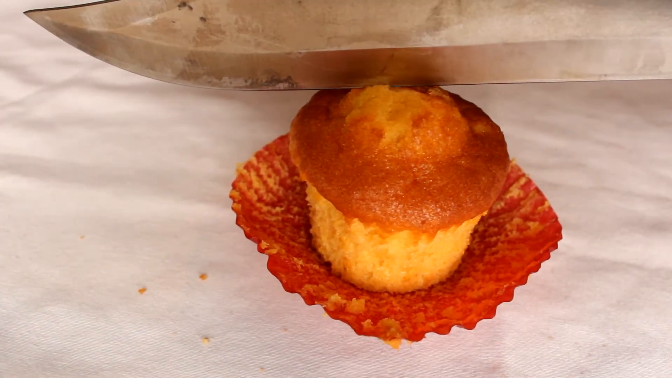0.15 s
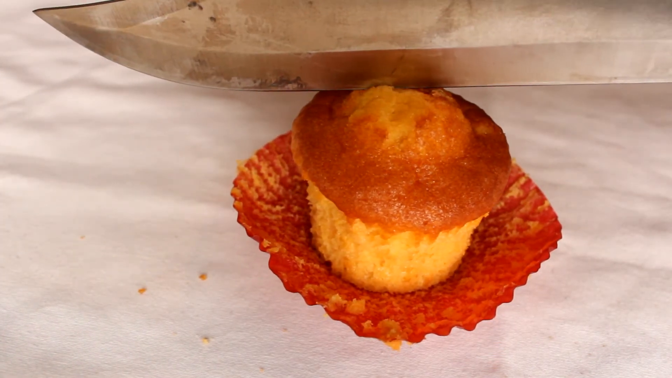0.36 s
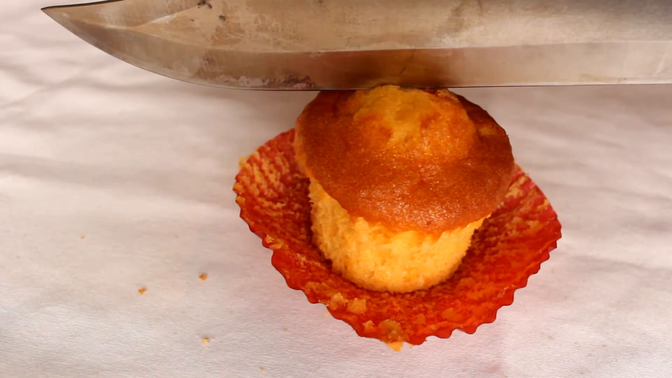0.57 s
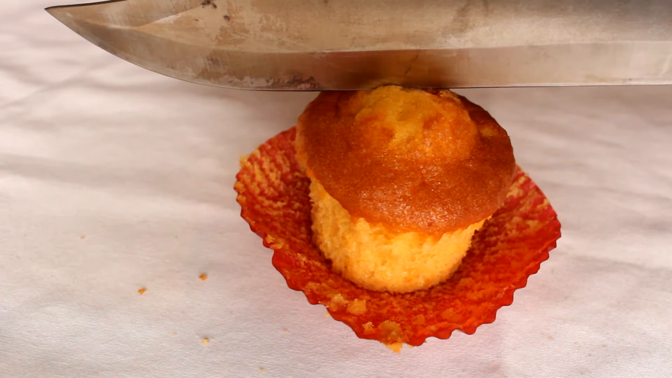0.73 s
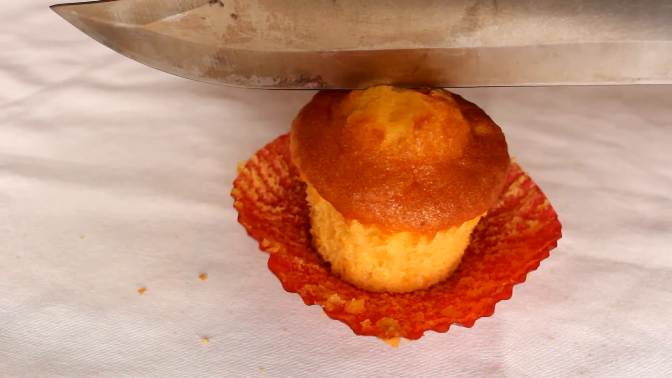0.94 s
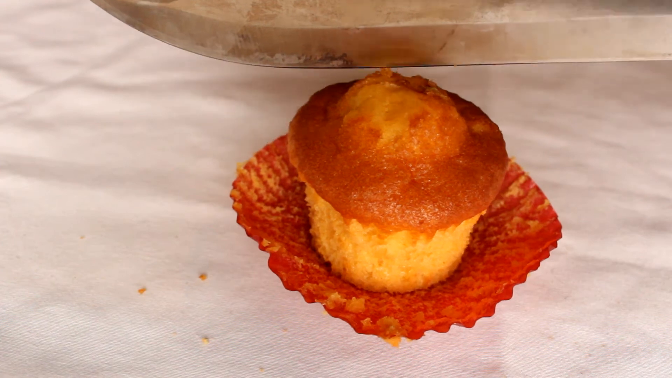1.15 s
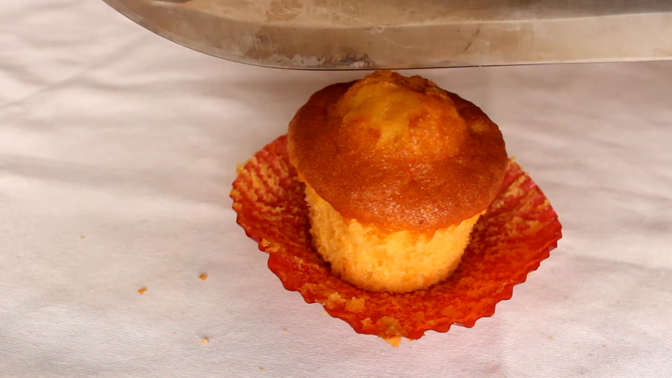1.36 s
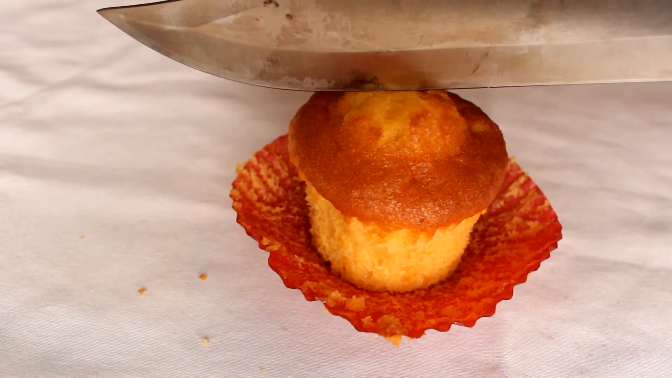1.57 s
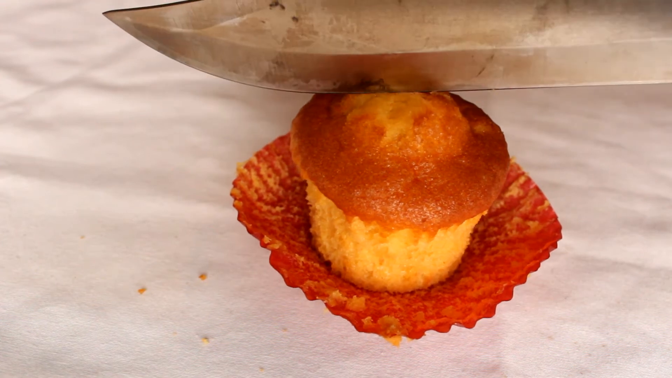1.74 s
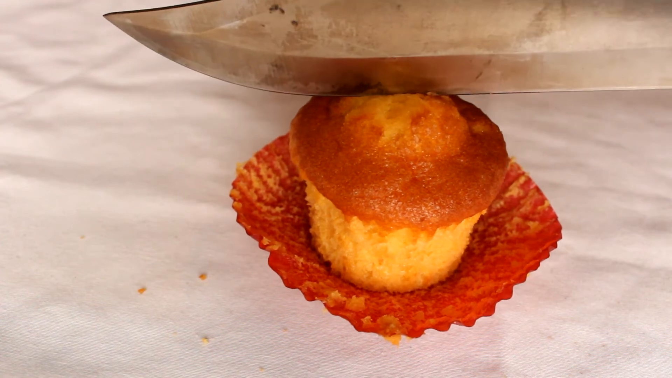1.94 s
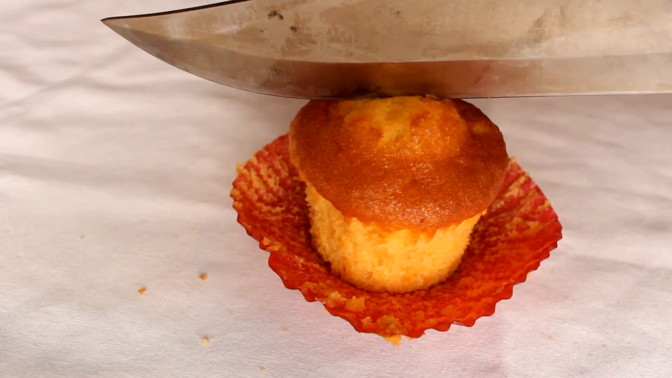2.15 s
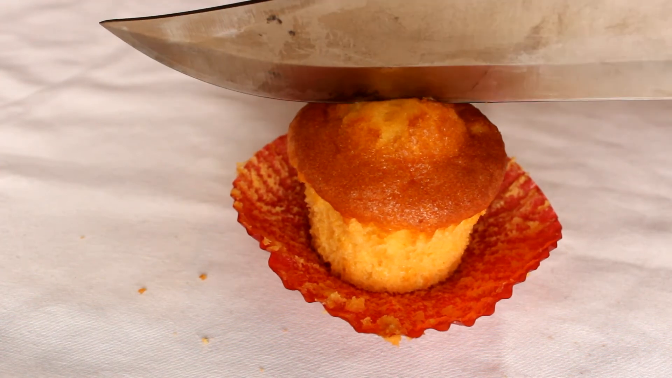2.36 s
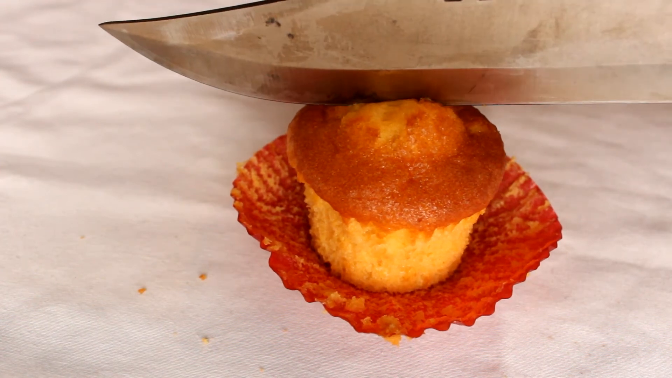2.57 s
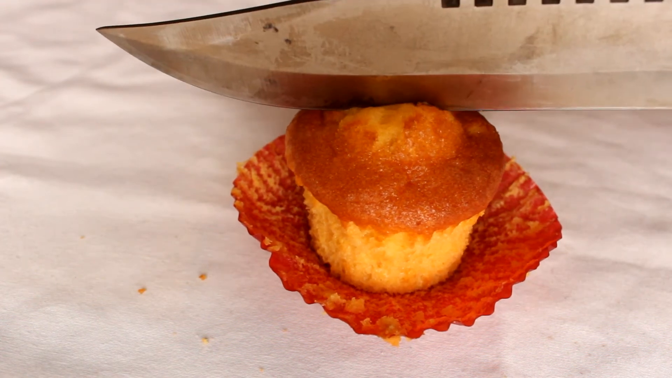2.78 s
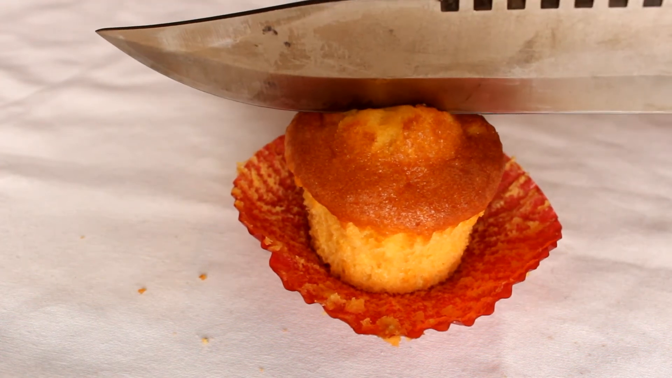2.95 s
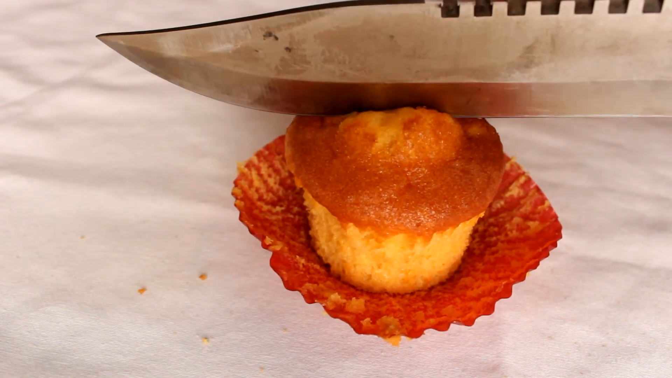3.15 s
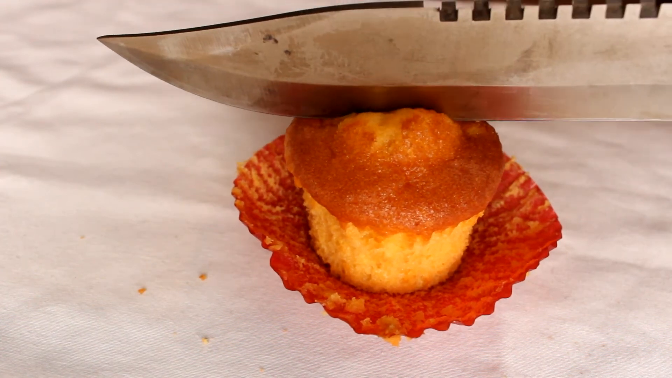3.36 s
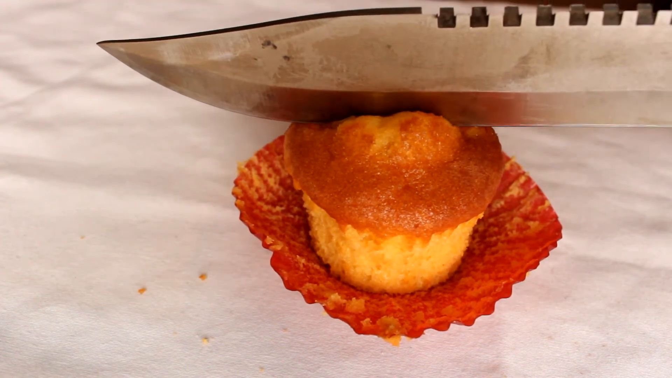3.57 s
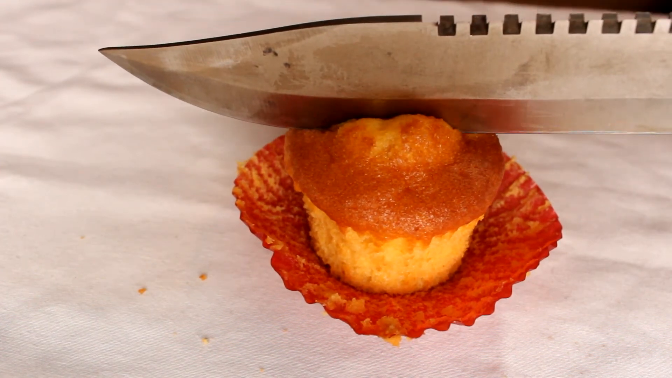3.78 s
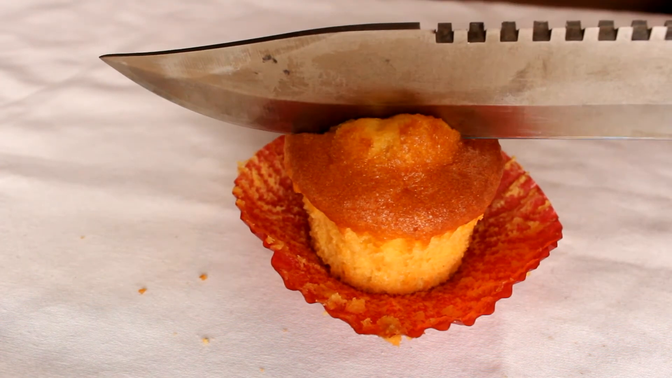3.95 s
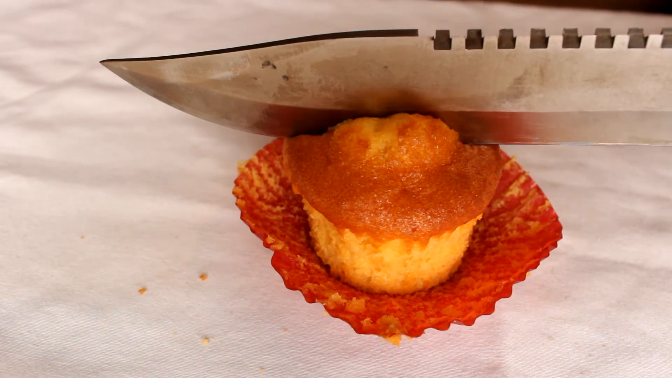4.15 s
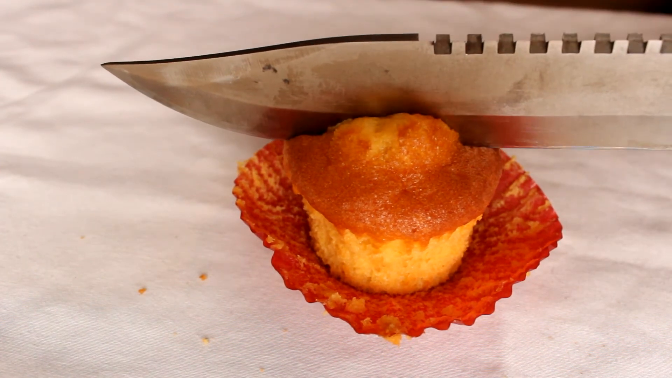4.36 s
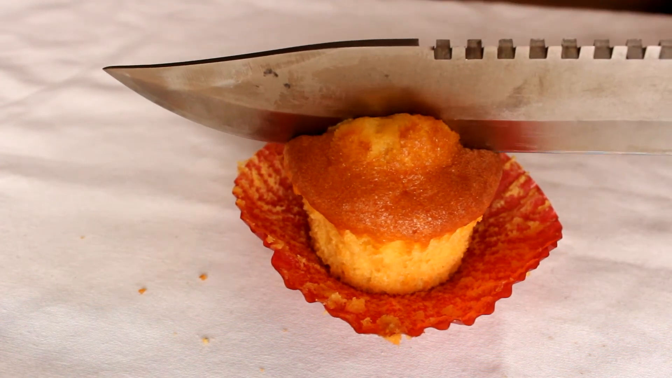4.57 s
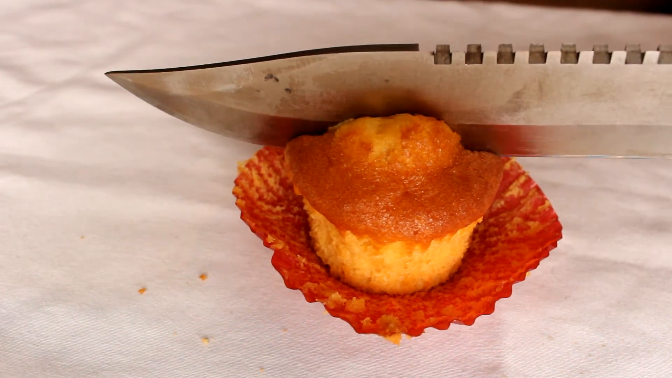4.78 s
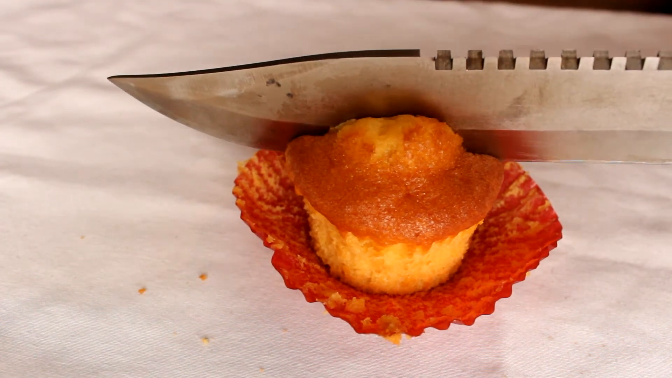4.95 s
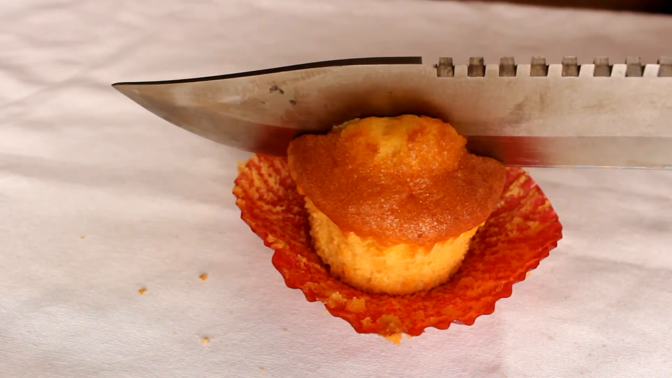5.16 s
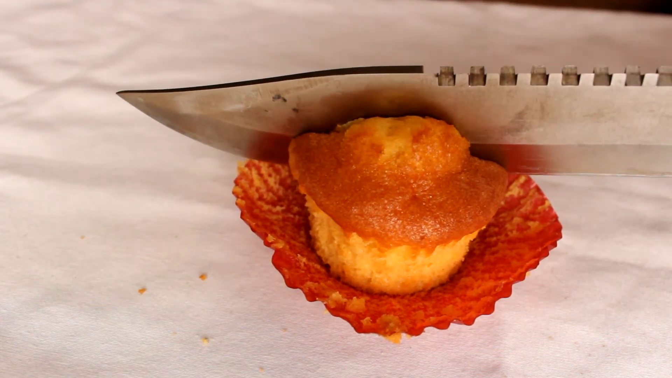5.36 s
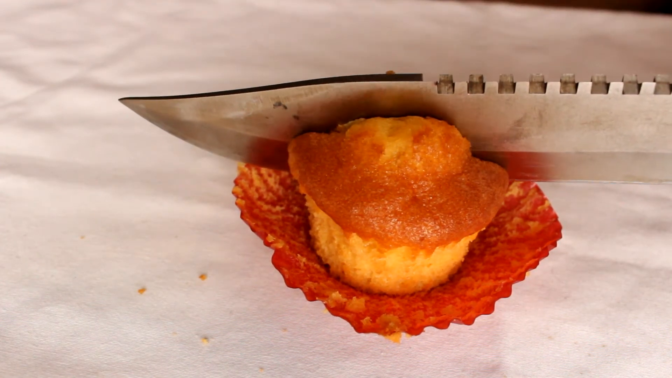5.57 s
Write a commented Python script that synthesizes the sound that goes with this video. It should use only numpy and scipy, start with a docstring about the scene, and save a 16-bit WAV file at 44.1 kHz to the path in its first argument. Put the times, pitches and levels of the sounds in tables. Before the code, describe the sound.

Close microphone, small quiet room, barely any echo. Steel edge brushes crust faintly for a second, with sparse specks of crackle and a soft thud. Then moisture boils on the blade: hissy, high, irregular snaps build quickly, peak bright, then mix with rounder, lower pops from inside the cake. Low rumble stays very faint. The crackle is strongest in the last half second and stops still sizzling.

```python
"""A quiet room with hum, and in it a cloth-covered table: a hot blade sinks slowly into a muffin, close by.
Moisture boils on the steel: a bright fizz of tiny bursts at the crust, then duller pops from deep steam pockets.
Bursts are spikes amid sputter, filtered into four colours for deep, crumb, crust and spray, over steam noise.
Brushing strokes, low rumble and one soft knock are shaped noise and a decaying sine; the table filters the sizzle."""
import sys
import numpy as np
from scipy import signal
from scipy.fft import rfft, irfft, next_fast_len
from scipy.io import wavfile
from scipy.ndimage import map_coordinates

SR = 44100
rng = np.random.default_rng(int(sys.argv[2]) if len(sys.argv) > 2 else 0)


def bounce(signal):
    """Save signal as a 16-bit WAV file at the path given by the first command-line argument."""
    frames = np.transpose(np.atleast_2d(signal))
    limited = np.clip(frames, -1, 1)
    pcm = np.round(limited * 32767).astype(np.int16)
    wavfile.write(sys.argv[1], SR, pcm)


N = 247842

# Boiling along the blade. Each row: time in seconds, deep pockets in dB, surface in dB.
BOIL_LEVELS = [(0.0,-76,-67), (0.33,-72.5,-61.5), (0.5,-73.5,-64.5), (0.92,-71.5,-72), (1.21,-78,-74.5),
               (1.32,-73,-69.5), (1.45,-76,-73), (1.5,-72,-61), (1.55,-74,-63), (1.61,-69.5,-55.5),
               (1.7,-68.5,-50.5), (1.87,-68.5,-52.5), (2.14,-60,-49), (2.5,-64,-48.5), (2.71,-59.5,-44.5),
               (2.96,-61,-44), (3.49,-56,-39.5), (3.66,-56.5,-41), (3.87,-53.5,-46.5), (4.02,-51.5,-47),
               (4.4,-51,-50), (4.66,-49,-49.5), (4.71,-46,-49), (4.86,-46.5,-51.5), (4.98,-45,-49.5),
               (5.12,-43,-52), (5.25,-41.5,-49), (5.28,-39,-48), (5.37,-40.5,-60), (5.435,-43,-48),
               (5.48,-42.5,-50), (5.52,-42.5,-46.5), (5.56,-38.5,-49), (5.62,-41,-47)]
# Crumb and crust are fed by both ends over a faint simmer: gain from deep dB, from surface dB, simmer level dB.
CRUMB_FEED_DB = (0, -8.5, -70)
CRUST_FEED_DB = (-7.5, -1.8, -97)


def depths():
    """Boiling level in dB at four depths (deep, crumb, crust, spray); the middle two add power from both ends."""
    deep_db, spray_db = curves(BOIL_LEVELS)

    def fed(from_deep_db, from_surface_db, simmer_db):
        power = amp(deep_db + from_deep_db) ** 2 + amp(spray_db + from_surface_db) ** 2 + amp(simmer_db) ** 2
        return 20 * np.log10(np.sqrt(power))

    return np.array([deep_db, fed(*CRUMB_FEED_DB), fed(*CRUST_FEED_DB), spray_db])


# Colour of each depth. Each row: frequency in Hz, relative level in dB.
DEEP_COLOUR = [(100, -71), (300, -19.5), (450, -11.5), (560, -5.5), (800, -0.5), (1250, 0.5), (1900, -3),
               (2600, -13), (6000, -56)]
CRUMB_COLOUR = [(300, -89), (1400, -8), (2000, -3.5), (2900, 1.5), (3600, 1.5), (4300, -2), (5500, -12),
                (9000, -43)]
CRUST_COLOUR = [(1000, -91), (3500, -29), (4200, -3.5), (4700, -2), (5300, -7), (6400, -2), (8500, -7.5),
                (10500, -9), (16000, -43)]
SPRAY_COLOUR = [(3000, -77), (7500, -8), (9300, -8), (10500, -3.5), (14500, -5), (15200, -11.5),
                (15900, -13.5)]
SMEAR = 0.31  # 0: depths arrive together as one sharp spike, 1: each rings after the blow
LEAN_RAD = -1.1  # phase turn: a short push leads the dip
SMALL_BURSTS_PER_S = 800


def boiling():
    """Thousands of small bursts of very unequal size, in clumps, over escaping steam; each heard at every depth."""
    count = round(SMALL_BURSTS_PER_S * N / SR)
    times = rng.random(count) * (N - 1) / SR
    rarity = -np.log(np.clip(rng.random((5, count)), .05, 1))  # row 0 shared by the depths, then one row each
    clumps = wobble(40)
    # Each row: colour, own size spread in dB, steam in dB under the pops.
    layers = [(DEEP_COLOUR, 3.5, -8), (CRUMB_COLOUR, 3.5, -7), (CRUST_COLOUR, 3, -3), (SPRAY_COLOUR, 2.2, 0.3)]
    out = np.zeros(N)
    for (colour, own_db, steam_db), level_db, own_rarity in zip(layers, depths(), rarity[1:]):
        size = amp(2.17 * rarity[0] + own_db * own_rarity)
        shapes = sputter(count, spit_db=-21, t60=0.0073)[:, :SR // 300]
        pops = unit(place(times, size[:, None] * shapes))
        steam = amp(steam_db) * rng.standard_normal(N)
        flow = amp(1.25 * clumps + 0.65 * wobble(25)) * (pops + steam)
        out += amp(level_db - 0.88) * unit(coloured(flow, colour, SMEAR, LEAN_RAD))
    return out


# The loudest steam bursts, peak strengths before the trims below.
# Each row: time in seconds, deep in dB, crumb in dB, crust and spray in dB.
LOUD_BURSTS = [(0.1563, -63, -47, -33.5), (0.183, -61, -47, -32), (0.2989, -63.0, -56, -33),
               (0.302, -67.5, -59, -33), (0.328, -53, -48.5, -34), (0.6207, -48.5, -58, -55),
               (1.322, -54, -60, -39), (1.4949, -61.0, -48, -35), (1.5571, -60, -47, -36),
               (1.5677, -65.5, -48, -34.5), (1.5961, -62, -47, -28), (1.6717, -53, -41, -31),
               (1.7488, -61.0, -45.0, -24), (1.7539, -63.0, -40, -26), (1.8291, -54, -37.5, -25),
               (1.8323, -52.0, -46, -25), (1.8377, -47.0, -45.5, -24), (1.8414, -59.5, -48.5, -27.0),
               (1.9325, -57, -40, -24), (1.9511, -42, -28.5, -16), (1.9724, -45, -34, -23),
               (2.0068, -47.5, -40, -33.5), (2.0162, -48.0, -42.0, -21), (2.0288, -45.5, -39, -21.5),
               (2.0874, -45, -34.5, -24.0), (2.1037, -46.0, -40.5, -19), (2.1168, -48, -33, -13.5),
               (2.1292, -58, -45.5, -23.5), (2.1339, -57, -45, -23.0), (2.1787, -39.5, -49, -18),
               (2.2238, -40, -37.5, -32.0), (2.2371, -45, -42, -22), (2.2427, -64.0, -46, -21),
               (2.2608, -43, -36, -22), (2.2714, -49, -40, -19), (2.2834, -54, -38, -24.0),
               (2.3158, -55.0, -41.0, -26.0), (2.3354, -35.0, -28.5, -15.5), (2.3425, -51.0, -41.0, -24),
               (2.3469, -49, -42, -33.0), (2.4043, -49, -40.0, -17.5), (2.4324, -51.0, -43.0, -26.0),
               (2.4368, -48.0, -40.5, -17), (2.4503, -52.0, -40, -20), (2.4897, -54, -45.0, -20),
               (2.5051, -50.5, -47, -29), (2.5178, -41, -32.5, -16.5), (2.5359, -46, -50.0, -29.0),
               (2.553, -52.5, -40.0, -26), (2.5596, -50.5, -46.0, -22), (2.5641, -45, -43, -31.5),
               (2.5702, -43, -36, -20), (2.5862, -46, -42.0, -22), (2.5922, -46.5, -40.5, -30.0),
               (2.6152, -52, -38.0, -26.0), (2.6249, -52, -61.0, -25), (2.6359, -45, -35.5, -22.0),
               (2.6462, -42, -37, -26), (2.6495, -49, -36.5, -16), (2.6643, -38.5, -35, -15),
               (2.6784, -37, -37.5, -16.5), (2.6977, -45.5, -34, -31), (2.7033, -41, -40.0, -35.0),
               (2.71, -49.5, -49.0, -30), (2.7273, -49, -41, -19.0), (2.7545, -36.5, -29, -21),
               (2.7598, -42, -45.0, -39.5), (2.7816, -40, -37, -14), (2.8027, -63.0, -43.5, -18),
               (2.8085, -54.0, -39.5, -19.5), (2.8164, -47.5, -36, -20.5), (2.8287, -47.0, -41.5, -17),
               (2.8488, -40.5, -44.5, -36.0), (2.8525, -54, -31, -14.0), (2.8594, -41, -40, -18),
               (2.9011, -48, -32, -18.5), (2.9064, -50, -32.5, -27), (2.9279, -35, -33.5, -15.5),
               (2.9335, -51, -36.5, -24.5), (2.9402, -49.0, -49.5, -20), (2.9579, -40, -33, -13),
               (2.9745, -39, -27, -11), (2.9842, -33, -31, -17), (3.0069, -44.0, -40.5, -13.5),
               (3.0186, -44.5, -32, -21.0), (3.0218, -42, -48.5, -19.5), (3.048, -53, -38.0, -18),
               (3.0542, -41.5, -32, -9), (3.063, -43.0, -26, -7.5), (3.0758, -42.0, -41, -34),
               (3.0827, -41.0, -36.0, -26), (3.101, -51, -47, -30), (3.1083, -43, -44, -29),
               (3.1194, -34, -25, -10.5), (3.1234, -34.0, -28, -41), (3.1555, -39.5, -39.0, -15.5),
               (3.1743, -47.5, -41, -24), (3.18, -49, -40, -17), (3.1833, -52, -34, -17.0),
               (3.1956, -55.0, -42, -17), (3.203, -61.0, -42, -25), (3.223, -51, -34, -15.5),
               (3.233, -49, -31, -20), (3.2527, -41.0, -32, -12), (3.2646, -36, -33.5, -14),
               (3.277, -38, -37.5, -15), (3.2974, -45, -36.5, -13), (3.3219, -41, -35, -15),
               (3.3372, -40, -29, -8.5), (3.3402, -46, -39, -28), (3.3547, -49, -38.0, -26),
               (3.3637, -45, -38, -10), (3.3735, -39, -43.0, -15), (3.3966, -37, -56.0, -17),
               (3.4154, -45, -30.5, -11.5), (3.4256, -38, -32.5, -13), (3.4299, -46.0, -35, -12),
               (3.4501, -52, -36, -17), (3.4759, -53, -39, -16), (3.5204, -51, -37, -20.5),
               (3.5296, -43.0, -36, -14), (3.5395, -44, -34, -16), (3.5442, -48, -35.5, -21.5),
               (3.5819, -38, -37, -18.5), (3.6007, -48.5, -36.5, -27), (3.6042, -41, -29.0, -18),
               (3.6129, -55, -40.0, -11.5), (3.6193, -33, -23.5, -13.0), (3.6251, -38, -34.0, -22),
               (3.6521, -31.5, -31, -15), (3.6566, -53.5, -41, -18.0), (3.7212, -36.0, -26, -21.5),
               (3.7316, -39, -33, -23.0), (3.7957, -52, -39.5, -16.5), (3.818, -45, -30.5, -19),
               (3.8305, -38.0, -46, -40.0), (3.8359, -32, -45, -35.5), (3.8703, -50.0, -40, -17),
               (3.9076, -45, -32, -18), (3.9319, -39.5, -40, -25.0), (3.9366, -34.5, -32, -21),
               (3.9545, -31, -33.0, -29), (4.0069, -31.5, -42.5, -38), (4.0185, -37, -36, -31.0),
               (4.0223, -47.5, -35.0, -20), (4.0393, -36, -35, -18), (4.0895, -34.5, -53, -36),
               (4.1675, -58.5, -43, -19.5), (4.1712, -34, -43, -21), (4.2312, -30, -41, -35.0),
               (4.2813, -42, -30.5, -33), (4.2915, -29.5, -43, -32.5), (4.3103, -48, -30.5, -19.5),
               (4.3486, -28.5, -50, -38), (4.3658, -31, -38, -34), (4.3712, -31, -34, -29.5),
               (4.3793, -29.5, -43, -35.5), (4.3911, -31, -28.5, -33), (4.3977, -27, -45, -39.5),
               (4.4251, -41, -40, -31), (4.459, -48, -36.0, -19), (4.487, -31, -29.5, -16),
               (4.4927, -40, -35.0, -30), (4.5125, -33, -31, -18), (4.5227, -45.5, -34, -30.0),
               (4.5304, -56.5, -41, -20), (4.5365, -34, -35, -32), (4.575, -27, -35, -34),
               (4.6157, -31, -45.0, -35), (4.6277, -35, -30, -35), (4.6439, -32, -38.5, -37.5),
               (4.6949, -31.5, -31, -32), (4.7119, -28.5, -25.5, -26), (4.727, -26.5, -30, -30.5),
               (4.7377, -41, -33, -28), (4.7566, -33, -32, -33.5), (4.7664, -30, -29, -25.5),
               (4.7694, -30, -23.5, -30), (4.7863, -41.0, -35.5, -22), (4.8293, -28, -28, -35.0),
               (4.8327, -49, -34, -23.5), (4.8545, -44, -39, -26), (4.8594, -39, -30, -28),
               (4.8737, -35, -40, -28), (4.8915, -32.5, -28.0, -31), (4.8945, -34, -31.0, -31),
               (4.9371, -52.5, -40.5, -21), (4.9481, -25.0, -26, -30), (4.9658, -46.5, -37, -18),
               (4.9756, -52.5, -36, -30), (4.9912, -24, -40, -32.0), (4.9953, -27, -39, -19),
               (5.031, -37.5, -38, -22.5), (5.0357, -50.5, -42.5, -21), (5.0421, -38.5, -27.0, -28),
               (5.0469, -28, -30, -32.5), (5.0505, -52, -30, -28), (5.0593, -26, -42, -33),
               (5.0703, -27, -32.0, -27), (5.0773, -40.5, -38.5, -18), (5.0847, -28, -27, -25),
               (5.0877, -48.5, -25, -19), (5.0952, -37, -28.0, -20.0), (5.1174, -49.5, -29, -18),
               (5.1233, -26, -27, -34.0), (5.1392, -29.5, -21, -13.5), (5.1571, -25, -20.5, -18),
               (5.1807, -35, -29, -21), (5.1946, -33, -20, -17.5), (5.212, -36, -29.5, -22),
               (5.2281, -26.5, -19, -18), (5.2363, -24.5, -29, -38.5), (5.2639, -29, -24, -36.5),
               (5.2678, -33.0, -30, -26), (5.2789, -51, -31, -28), (5.2861, -34, -19, -22.5),
               (5.29, -48.0, -25, -15), (5.2949, -40, -26, -21), (5.3199, -30, -18, -9.5),
               (5.3335, -42.5, -37, -18.5), (5.3427, -36, -32, -17), (5.3467, -46, -31, -20),
               (5.3605, -24.5, -13.5, -17.0), (5.3784, -37, -21, -13), (5.3953, -27, -26, -21),
               (5.3984, -26, -27, -19), (5.4161, -34, -23, -17), (5.4433, -34.5, -25, -20),
               (5.4496, -43, -26, -25.0), (5.457, -35.5, -26, -24), (5.4632, -27, -20.5, -5.5),
               (5.4777, -28.0, -18, -17.0), (5.4817, -39, -31, -17), (5.4851, -27, -40.5, -30.0),
               (5.4937, -30, -23, -25), (5.498, -37, -25, -18), (5.5422, -36, -25, -25),
               (5.5481, -42, -21, -21.0), (5.558, -31, -15, -28), (5.5627, -50.5, -33, -25),
               (5.568, -39.5, -31, -17), (5.5839, -35, -26.5, -19.0), (5.599, -43, -24, -21.5),
               (5.6056, -42, -26, -24), (5.6121, -49.5, -25, -19)]


def bursts():
    """Each burst strikes the depths in its own proportion; the spray's share follows the boiling's brightness."""
    now = depths()
    s, deep_db, crumb_db, top_db = np.vstack([LOUD_BURSTS, middling(now)]).T
    bright_db = 0.32 * (now[3] - now[2])[(s * SR).astype(int)]
    deep = struck(s, deep_db, DEEP_COLOUR, spit_db=-22.5, t60=0.015)
    crumb = struck(s, crumb_db + 2.0, CRUMB_COLOUR, spit_db=-21, t60=0.014)
    crust = struck(s, top_db - bright_db - 7.5, CRUST_COLOUR, spit_db=-21, t60=0.012)
    spray = struck(s, top_db + bright_db - 8.0, SPRAY_COLOUR, spit_db=-18, t60=0.013)
    return deep + crumb + crust + spray


MIDDLING_PER_S = 90
MIDDLING_OVER_BOIL_DB = (5.5, 4.5, 7)  # deep, crumb, top
SIZE_SCATTER_DB, DEPTH_SCATTER_DB = 4.5, 6  # either way: whole burst, each depth


def middling(now):
    """Rows like the loud bursts, at random moments and of random size, each depth struck unevenly."""
    luck = rng.random((round(MIDDLING_PER_S * N / SR), 5))
    at = (luck[:, 0] * (N - 1)).astype(int)
    top_db = np.maximum(now[2], now[3])
    base_db = np.array([now[0], now[1], top_db])[:, at].T
    size_db = SIZE_SCATTER_DB * (2 * luck[:, -1:] - 1)
    uneven_db = DEPTH_SCATTER_DB * (2 * luck[:, 1:-1] - 1)
    return np.column_stack([at / SR, base_db + MIDDLING_OVER_BOIL_DB + size_db + uneven_db])


def struck(s, db, points, spit_db, t60):
    """Bursts at times s in one colour, each scaled so that it peaks near its level."""
    lone = coloured(signal.unit_impulse(N, SR), points, SMEAR)
    peak = np.abs(signal.hilbert(lone)).max()
    hits = place(s, amp(db)[:, None] * sputter(len(s), spit_db, t60))
    return coloured(hits, points, SMEAR, LEAN_RAD) / peak


TWIN_LAG_S, TWIN_MOST = (.00012, .0006), .5  # range of lags; largest share of the spike, either sign


def sputter(count, spit_db, t60):
    """Rows of a thin pressure spike and its twin amid weak random sputter that gathers quickly, dies more slowly."""
    t = np.arange(-SR // 1000, SR // 200) / SR
    decay_db = -60 * np.where(t < 0, -1.6 * t, t) / t60
    rows = amp(spit_db + decay_db) * rng.standard_normal((count, len(t)))
    rows[:, t == 0] = -1
    # the twin gives each burst its own colour
    lag, share = rng.random((count, 2)).T
    twin_at = np.searchsorted(t, np.interp(lag, [0, 1], TWIN_LAG_S))
    rows[np.arange(count), twin_at] += TWIN_MOST * (2 * share - 1)
    return rows


# The dry edge brushes the crust.
# Each row: peak time in seconds, length in seconds, rustle in Hz, rustle in dB, thin hiss in dB.
BRUSH_STROKES = [(0.004, 0.035, 2220, -54, -66), (0.054, 0.046, 2480, -55, -57.5),
                 (0.397, 0.093, 3370, -63, -59), (0.63, 0.042, 3660, -64, -72),
                 (0.798, 0.06, 3600, -62.5, -71), (0.851, 0.062, 2520, -62.5, -69),
                 (0.998, 0.036, 2500, -62.5, -84)]
BRUSH_RISE, SCRATCH_DB = 0.26, -5  # rise as a share of the length; scratch relative to the rustle


def brush():
    """Each stroke rises fast and fades: resonant rustle, a broad scratch over it, a narrow hiss above, all gritty."""
    t = np.arange(N) / SR
    hiss_colour = [(6500, -45), (7300, 4), (8000, -1), (9000, -5), (12000, -49)]
    hiss = unit(coloured(rng.standard_normal(N), hiss_colour))
    scratch_colour = [(2000, -24), (3000, -5), (4200, -2.0), (5000, -6), (5600, -30)]
    scratch = unit(coloured(rng.standard_normal(N), scratch_colour))
    out = np.zeros(N)
    for s, length, hz, db, hiss_db in BRUSH_STROKES:
        rustle = unit(signal.lfilter(*signal.iirpeak(hz, 6, SR), rng.standard_normal(N)))
        swell = np.exp(-((t - s) / (length * np.where(t < s, BRUSH_RISE, 1))) ** 2)
        out += swell * (amp(db) * (rustle + amp(SCRATCH_DB) * scratch) + amp(hiss_db) * hiss)
    grit = unit(amp(2.2 * wobble(300)))
    return out * grit


# Dips and humps from the table's reflection. Each row: centre in Hz with blade high, centre in Hz with blade low,
# gain in dB with blade high, gain in dB with blade low, width in Hz.
TABLE_DIPS = [(2230, 2470, -2.5, -2, 310), (3870, 3600, -1, -2.5, 250), (4520, 4280, 0.3, 2.5, 410),
              (5910, 5550, -14, -2, 260), (6050, 6240, 4, 4.5, 380), (12600, 12700, -2.5, -4, 460)]
# Each row: time in seconds, how far the blade has sunk from 0 to 1.
BLADE_SINK = [(2.9, 0), (4.1, 1)]


def reflected(x):
    """The table's reflection cuts dips and humps; two fixed filters cross-fade as the source sinks."""
    def through_dips(low):
        def gain_db(f):
            return sum(row[2 + low] / (1 + (2 * (f - row[low]) / row[4]) ** 2) for row in TABLE_DIPS)
        return filtered(x, gain_db)

    (sunk,) = curves(BLADE_SINK)
    return (1 - sunk) * through_dips(0) + sunk * through_dips(1)


# A low rumble swells as the blade presses down. Each row: time in seconds, level in dB.
PRESS_LEVELS = [(3.5, -76), (4.0, -74.5), (4.35, -68.5), (5.0, -67), (5.15, -70), (5.62, -77)]


def rumble():
    """Lumpy low noise from the pressed cake and table, with a deeper shudder that grows with the deep boiling."""
    (press_db,) = curves([(0, -120)] + PRESS_LEVELS)
    low_colour = [(80, -41), (170, -9.0), (230, 1.5), (320, -5.0), (450, -51), (1000, -36)]
    low = unit(coloured(rng.standard_normal(N), low_colour))
    shudder_colour = [(10, -12), (25, -4), (60, -5), (100, 2), (200, -54)]
    shudder = unit(coloured(rng.standard_normal(N), shudder_colour))
    shudder_db = -70.0 + 0.41 * depths()[0] + 2.3 * wobble(8.9)
    return amp(press_db + 2.2 * wobble(12)) * low + amp(shudder_db) * shudder


# Colour of the air noise. Each row: frequency in Hz, relative level in dB.
ROOM_COLOUR = [(20, -46), (70, -26), (130, -12), (220, -3.5), (330, -6.5), (560, -14.5), (760, -15.5),
               (1050, -30), (1600, -3), (2300, -14.5), (3500, -6.5), (4900, -13), (5800, -19),
               (7500, -18.5), (15000, -21.5)]
# Hum overtones. Each row: frequency in Hz, rms level in dB before wavering.
HUM_TONES = [(120, -90.5), (240, -84), (300, -77), (480, -86.5), (540, -88.5), (720, -88), (785, -84.5)]
AIR_DB = -65.5
THUD_S, THUD_HZ, THUD_T60_S, THUD_DB = 0.797, 184, 0.075, -54  # level before the soft attack


def room():
    """Air noise, one soft low knock, and hum whose overtones drift together but waver one by one."""
    t = np.arange(N) / SR
    air = amp(AIR_DB) * unit(coloured(rng.standard_normal(N), ROOM_COLOUR))
    drift = 0.29 * wobble(3.08)
    hum = np.zeros(N)
    for hz, db in HUM_TONES:
        level = np.sqrt(2) * amp(db + 2.8 * wobble(18) + 2.2 * wobble(4.98))
        phase = 2 * np.pi * hz * t + hz / 300 * drift + hz / 450 * wobble(14)
        hum += level * np.sin(phase)
    late = np.clip(t - THUD_S, 0, None)
    attack = 1 - np.exp(-late / .004)
    thud = amp(THUD_DB - 60 * late / THUD_T60_S) * np.sin(2 * np.pi * THUD_HZ * late) * attack
    return air + hum + thud


def amp(db):
    """Gain of a level in dB."""
    return 10 ** (np.asarray(db) / 20)


def unit(x):
    """x at rms 1."""
    return x / np.sqrt(np.mean(x ** 2) + 1e-20)


def curves(rows):
    """One value per sample for each column after the time."""
    s, *cols = np.transpose(rows)
    return [np.interp(np.arange(N) / SR, s, c) for c in cols]


def wobble(rate):
    """A smooth random curve, rate knots a second."""
    knots = rng.standard_normal(int(N * rate / SR) + 4)
    return map_coordinates(knots, [np.arange(N) * rate / SR])


def filtered(x, db_of, smear=1, turn=0):
    """x through a level in dB over frequency; smear scales its minimum-phase delay, turn shifts phase in radians."""
    m = 2 * next_fast_len(N // 2 + SR // 10)
    # folding the cepstrum gives the minimum phase
    cep = irfft(np.log(amp(db_of(np.fft.rfftfreq(m, 1 / SR)))), m)
    cep[1:m // 2] *= 2
    cep[m // 2 + 1:] = 0
    log = rfft(cep)
    return irfft(rfft(x, m) * np.exp(log.real + 1j * (smear * log.imag + turn)), m)[:N]


def coloured(x, points, smear=1, turn=0):
    """x shaped by (Hz, dB) points read on a log axis."""
    hz, db = np.transpose(points)
    return filtered(x, lambda f: np.interp(np.log(f + 1), np.log(hz + 1), db), smear, turn)


def place(times, shapes):
    """Sum one row of samples at each time; rows begin a millisecond early."""
    width = shapes.shape[1]
    at = np.round(np.asarray(times) * SR).astype(int)[:, None] + np.arange(width)
    early = -(-SR // 1000)
    return np.bincount(at.ravel(), shapes.ravel(), N + width)[early:][:N]


ECHO_DB, ECHO_T60_S, ECHO_LAG_SAMPLES = -12, 0.088, 90


def scene():
    """The sizzle, coloured by the table and answered briefly by near surfaces, over rumble and room."""
    near = reflected(boiling() + bursts() + brush())
    t = np.arange(SR // 8) / SR
    tail = unit(rng.standard_normal(len(t)) * amp(-60 * t / ECHO_T60_S)) / np.sqrt(len(t))
    echo = signal.fftconvolve(np.pad(near, (ECHO_LAG_SAMPLES, 0)), tail)[:N]
    return (near + amp(ECHO_DB) * echo + rumble() + room())[None]


TOP_HZ = 15900


def record(dry):
    """A sharp spectral cut: nothing is kept at or above the band limit."""
    m = next_fast_len(N + SR // 10)
    kept = np.fft.rfftfreq(m, 1 / SR) < TOP_HZ
    return irfft(rfft(dry, m) * kept, m)[:, :N]


dry = scene()
out = record(dry)
bounce(out)
```